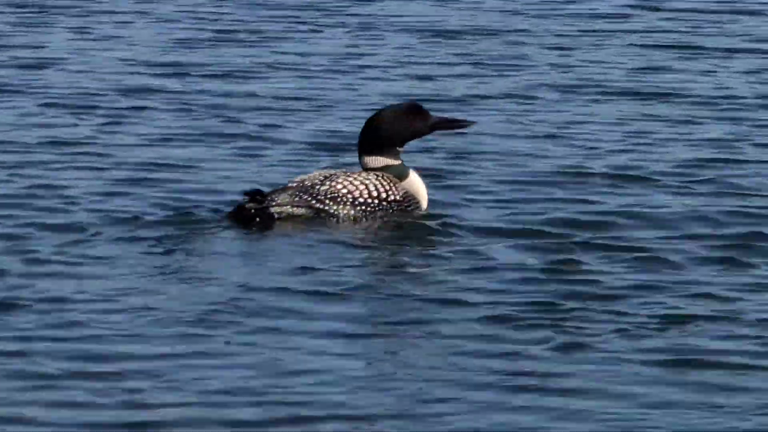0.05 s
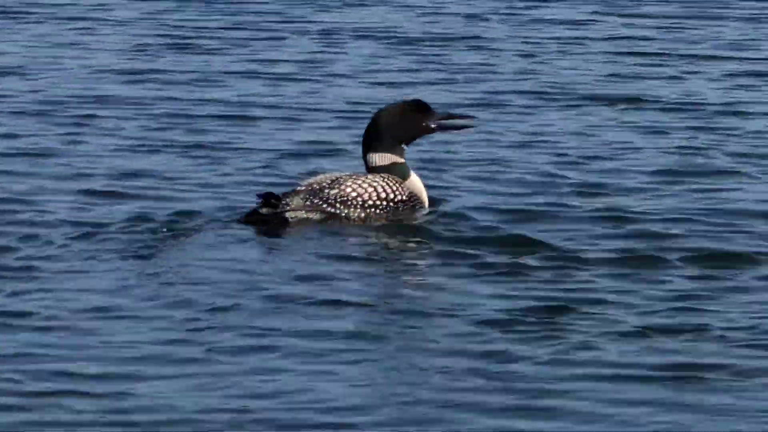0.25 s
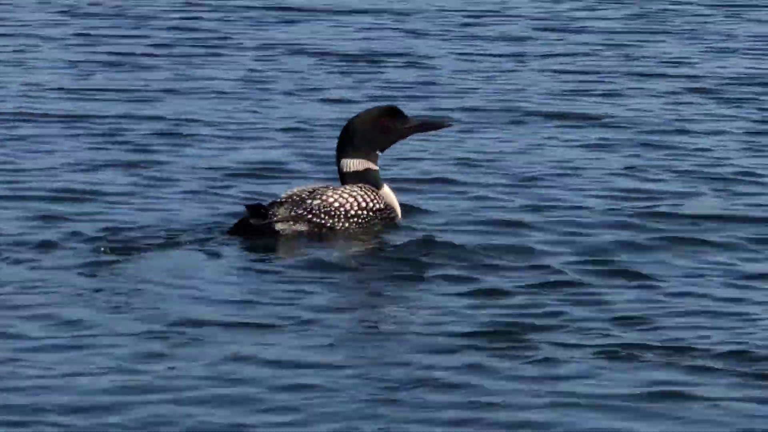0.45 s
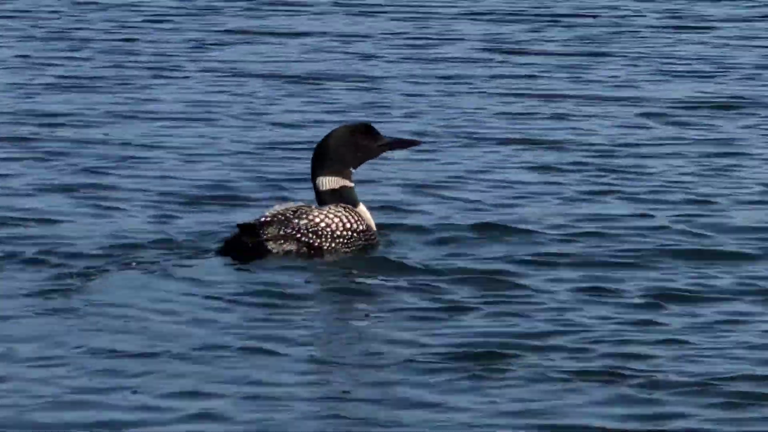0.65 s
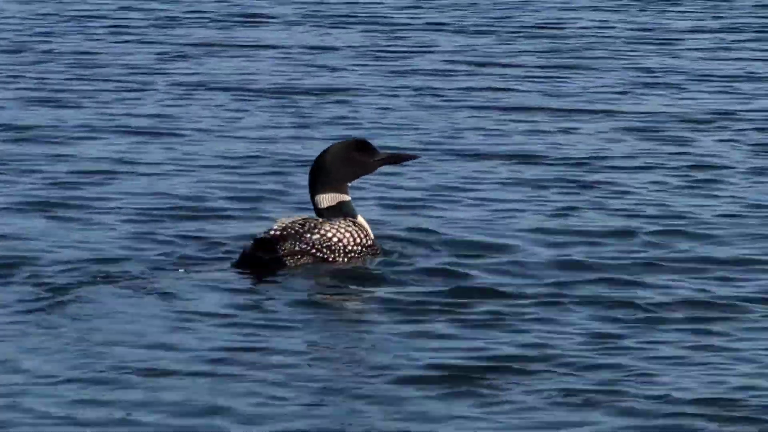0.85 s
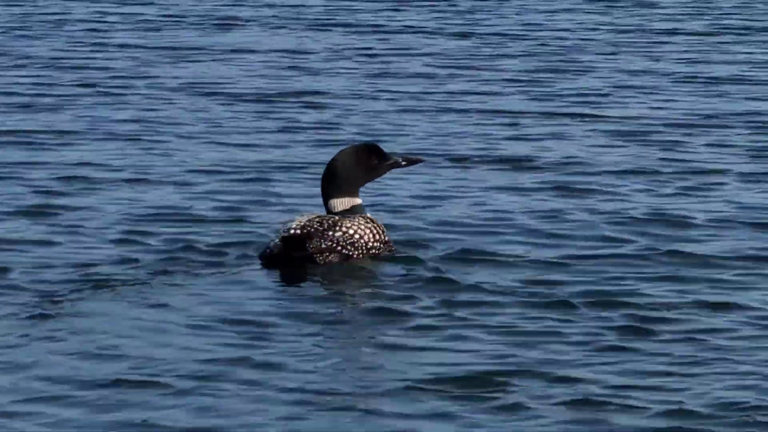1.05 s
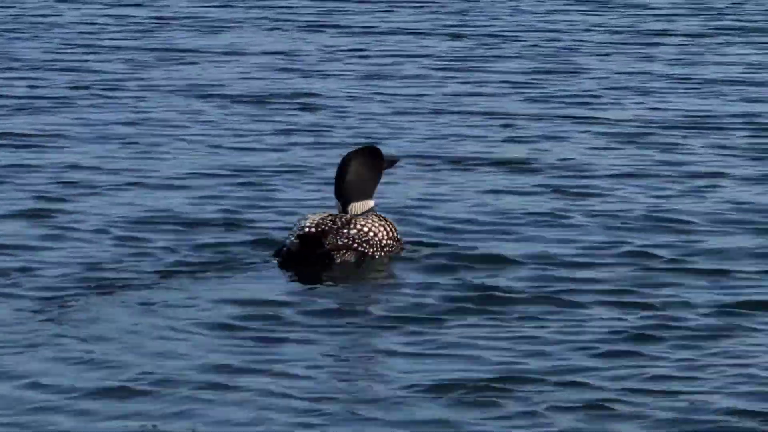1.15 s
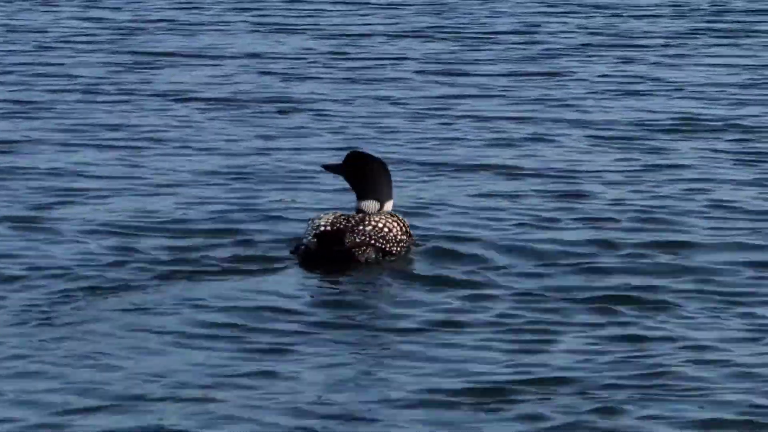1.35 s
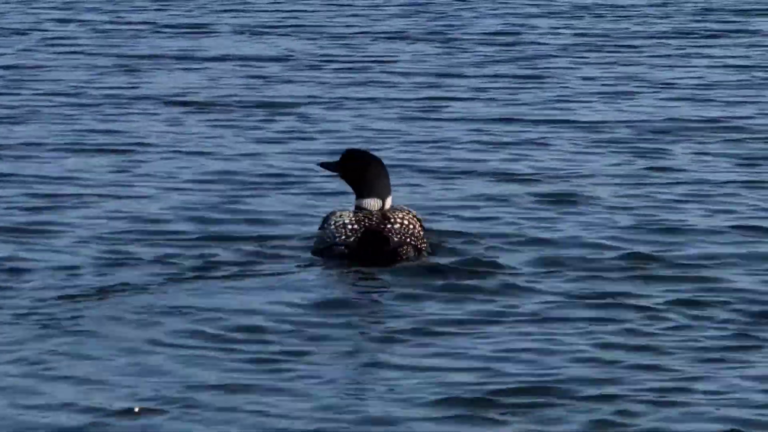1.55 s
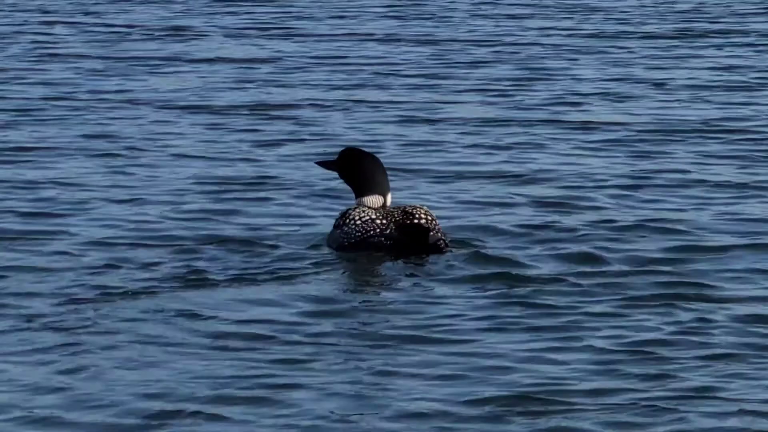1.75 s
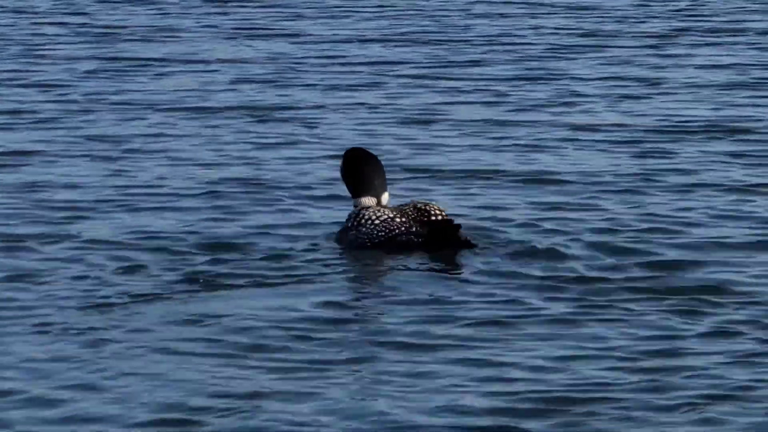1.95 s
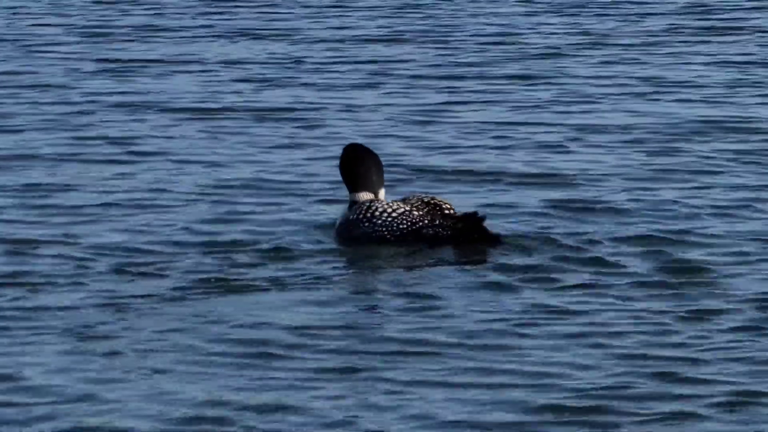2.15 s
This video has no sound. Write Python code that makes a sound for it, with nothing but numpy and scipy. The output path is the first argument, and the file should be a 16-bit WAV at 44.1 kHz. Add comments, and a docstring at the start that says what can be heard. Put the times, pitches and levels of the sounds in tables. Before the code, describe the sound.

Loon calls over a lake. From 0 s one loon holds a smooth, hollow wail, sagging and breaking low near 0.8 s. At 0.16 s a second slides up, flips high and gives three loud, slightly raspy swells around 0.36, 0.47 and 0.59 s, ending by 0.65. A faint echo lingers over soft breeze; low water thuds, small knocks near 1.2 and 1.9 s, and distant chirps from 1 s.

```python
"""Two loons on a quiet lake

One loon holds a smooth wail, a few harmonics that sag and break into a low note at the end.
The other slides up in its low register, flips to the high one and gives three loud tremolo swells,
pitch and level rising together. The wooded shore returns a faint echo, made by a decaying noise tail.
Water laps and knocks near the microphone as low sine thuds and ringing noise. Far off a small bird
chirps in short sine glides, over shaped noise for the open air and breeze."""
import sys
import numpy as np
from scipy import signal
from scipy.fft import rfft, irfft
from scipy.io import wavfile
from scipy.ndimage import uniform_filter1d, minimum_filter1d

SR = 44100
rng = np.random.default_rng(int(sys.argv[2]) if len(sys.argv) > 2 else 0)


def master_out(mix):
    """Clip the mix to full scale and print it as 16-bit PCM to the path in sys.argv[1]."""
    frames = np.transpose(np.atleast_2d(mix))
    ceiling = np.clip(frames, -1, 1)
    pcm = np.round(ceiling * 32767).astype(np.int16)
    wavfile.write(sys.argv[1], SR, pcm)


N = 97020  # 2.2 s

SIDES = np.array([[1], [-1]])  # left, right
JITTER, JITTER_HZ = 0.0026, 266  # pitch tremble as a fraction of pitch, and its fastest rate
SHIMMER_DB = 0.19


def undb(db):
    """Decibels to amplitude."""
    return 10 ** (np.asarray(db) / 20)


def times():
    """Time of each sample in seconds."""
    return np.arange(N) / SR


def bins():
    """Frequency of each spectrum bin in Hz."""
    return np.arange(N // 2 + 1) * SR / N


def curves(table):
    """Each column of a table, joined by straight lines in time."""
    a = np.array(table, float)
    return [np.interp(times(), a[:, 0], column) for column in a.T[1:]]


def gate(table):
    """Open from a table's first row to its last, with 4 ms ramps."""
    since_start = times() - table[0][0]
    until_end = table[-1][0] - times()
    return np.clip(np.minimum(since_start, until_end) / .004, 0, 1)


def at(table, hz, axis=1):
    """A column of a table on a log-frequency axis."""
    a = np.array(table, float)
    return np.interp(np.log(np.maximum(hz, 1)), np.log(a[:, 0]), a[:, axis])


def bell(centre_s, half_s):
    """A rounded rise and fall that stands at half height half_s from its centre."""
    return .5 ** (((times() - centre_s) / half_s) ** 2)


def pan(left_minus_right_db):
    """Gains that split a level difference evenly between left and right."""
    return undb(SIDES * left_minus_right_db / 2)


def colour(x, gain):
    """Filter a sound with a gain for each frequency."""
    return irfft(rfft(x) * gain, N)


def noise(gain):
    """Noise of rms 1 with a gain for each frequency."""
    x = colour(rng.standard_normal(N), gain)
    return x / x.std()


def walk(hz):
    """Smooth chance of rms 1, mostly slower than a given rate."""
    return noise(1 / (1 + (bins() / hz) ** 4))


def turn(hz, steadiness=1):
    """Phase of a pitch that trembles slightly; a smaller steadiness factor trembles less."""
    return 2 * np.pi * np.cumsum(hz * (1 + steadiness * JITTER * walk(JITTER_HZ))) / SR


def partial(phase, db):
    """One harmonic of a given rms level, shimmering a little."""
    return np.sqrt(2) * undb(db + SHIMMER_DB * walk(120)) * np.sin(phase)


# open-air hiss at the microphone: pitch_hz, relative_level_db
AIR_COLOUR = [(60, -9), (130, -2), (200, 0), (330, -6.5), (450, -6.5), (760, -12), (900, -17),
              (1600, -22.5), (2100, -18.5), (2800, -19), (3600, -26.5), (5000, -29), (8000, -37.5),
              (12000, -30), (15000, -34)]
# how far the hiss spreads between the channels: pitch_hz, side_gain
AIR_SPREAD = [(100, .3), (700, 0.57), (3000, .6), (6000, .9), (15000, 1)]
# low breeze: pitch_hz, relative_level_db
RUMBLE_COLOUR = [(15, -8.5), (35, 0.5), (65, -1), (120, -7), (250, -22), (600, -40.5), (2000, -77.5)]
# swell of the breeze before its random waver: time_s, level_db
RUMBLE_LEVEL = [(0, -64.5), (.3, -57.5), (.5, -51), (.7, -58.5), (1.0, -56), (1.3, -65.5), (1.62, -67.5),
                (1.8, -56.5), (2.0, -56.5), (2.2, -67)]


def air(hiss_db=-63.5, hiss_waver_db=1.6, rumble_waver_db=4.4, rumble_side=.9):
    """Open-air hiss over a low breeze: shaped noises wavering in level, each with a side part for width."""
    hiss_gain = undb(at(AIR_COLOUR, bins())) * bins() / np.hypot(bins(), 90)  # thinned below 90 Hz
    hiss_side = colour(noise(hiss_gain), at(AIR_SPREAD, bins()))
    hiss = undb(hiss_db + hiss_waver_db * walk(8.6)) * (noise(hiss_gain) + SIDES * hiss_side)
    low_gain = undb(at(RUMBLE_COLOUR, bins()))
    rumble_level = undb(curves(RUMBLE_LEVEL)[0] + rumble_waver_db * walk(6.4))
    rumble = rumble_level * (noise(low_gain) + SIDES * rumble_side * noise(low_gain))
    return hiss + rumble


# small bird far off: start_s, length_s, start_pitch_hz, end_pitch_hz, peak_level_db
CHIRP_NOTES = [(0.979, .06, 2650, 2500, -66), (1.037, 0.045, 3210, 3120, -70),
               (1.096, 0.073, 2770, 3100, -72), (1.508, 0.058, 2560, 2840, -73),
               (1.58, 0.0557, 2940, 2764, -73), (1.724, 0.0331, 2850, 2700, -71),
               (1.792, 0.03, 3800, 4245, -73), (1.788, 0.047, 3020, 2960, -66),
               (1.877, .05, 2900, 2455, -64.5), (1.919, 0.0503, 2500, 2860, -65),
               (2.093, .035, 2720, 2790, -70), (2.154, 0.029, 2750, 2950, -69.5)]


def songbird(warble=.03):
    """Faint whistled glides: sines sliding between two pitches with a random warble, a fraction of pitch."""
    out = 0
    for start_s, length_s, start_hz, end_hz, db in CHIRP_NOTES:
        progress = np.clip((times() - start_s) / length_s, 0, 1)
        glide = start_hz + (end_hz - start_hz) * progress
        whistle = np.sin(turn(glide * (1 + warble * walk(145))))
        out = out + undb(db) * np.sin(np.pi * progress) * whistle
    return out


# low thuds near the microphone: centre_s, pitch_hz, peak_level_db, half_length_s
WATER_THUDS = [(0.058, 51.43, -57, .02), (0.251, 49.83, -46, 0.018), (.43, 55, -43.5, 0.019),
               (0.754, 59.6, -34.5, 0.0093), (0.781, 66.37, -40, 0.018), (0.867, 57.5, -39, 0.017),
               (0.941, 119.2, -40.5, 0.0096), (0.979, 86.2, -48, 0.017), (1.055, 65.4, -49, 0.017),
               (1.185, 70.44, -45, 0.0089), (1.226, 51.1, -44, 0.015), (1.721, 50, -44, .02),
               (1.795, 54.5, -38.5, 0.016), (1.903, 54.3, -45, 0.0089), (1.969, 57, -51, 0.019)]
# laps and knocks near the microphone: start_s, centre_hz, width_hz, level_db, t60_s, left_minus_right_db
WATER_KNOCKS = [(.93, 430, 380, -42, .12, 0), (1.2088, 1100, 220, -31.5, .03, 1),
                (1.209, 2200, 1500, -53, .045, 0), (1.212, 230, 300, -44, .13, 1),
                (1.52, 400, 600, -57, .3, 0), (1.8745, 2800, 1000, -44, .03, -3),
                (1.875, 1080, 300, -54, .03, 0), (1.9135, 2050, 550, -42, .033, -3),
                (1.914, 1020, 250, -49, .035, 0), (1.926, 300, 350, -55, .25, 3)]


def water(thud_pan_db=-2, knock_attack_s=.001, knock_top_hz=3573):
    """Lapping water: low sine thuds under bell envelopes, and resonant noise that dies exponentially."""
    out = np.zeros((2, N))
    for centre_s, hz, db, half_s in WATER_THUDS:
        cycles = hz * (times() - centre_s) + rng.random()
        thud = undb(db) * bell(centre_s, half_s) * np.sin(2 * np.pi * cycles)
        out += thud * pan(thud_pan_db)
    for start_s, hz, width_hz, db, t60_s, pan_db in WATER_KNOCKS:
        age = np.maximum(times() - start_s, 0)
        detuning = hz / width_hz * (bins() / hz - hz / (bins() + 1))
        ring = noise(1 / (1 + detuning ** 2) / (1 + (bins() / knock_top_hz) ** 4))
        decay = undb(db - 60 * age / t60_s) * (1 - np.exp(-age / knock_attack_s))
        out += ring * decay * pan(pan_db)
    return out


# dull colour of the distant shore: pitch_hz, gain_db
SHORE_COLOUR = [(400, -1), (650, 6), (780, -0.5), (1250, -8.5), (1450, -6.5), (1600, -7), (2500, -5),
                (5000, -6.5)]


def shore(calls, echo_db=-36.5, t60_s=3.56, build_s=0.027):
    """A faint, dull, long echo from the wooded shore: a separate decaying noise tail for each channel."""
    tail = undb(-60 * times() / t60_s) * (1 - np.exp(-times() / build_s))
    tail = tail / np.sqrt(np.sum(tail ** 2))
    dulled = colour(calls, undb(at(SHORE_COLOUR, bins())))
    echoes = [signal.fftconvolve(dulled, tail * rng.standard_normal(N))[:N] for _ in range(2)]
    return undb(echo_db) * np.array(echoes)


def low_note(table, throat, count, rolloff_db=10.5, rasp=.05):
    """Low register: four strong harmonics, then a roll-off that steepens when soft, through the throat."""
    hz, db = curves(table)
    phase = turn(hz)
    below_peak_db = np.maximum(db - db.max(), -30)
    roll_db = rolloff_db - 0.22 * below_peak_db  # lost with each harmonic above the fourth
    out = 0
    for k in range(1, count + 1):
        level_db = db + at(throat, k * hz) - roll_db * max(k - 4, 0)
        out = out + partial(k * phase, level_db) * (1 + rasp * walk(300))
    return gate(table) * out


# first loon's held note: time_s, pitch_hz, fundamental_db, octave_db
WAIL_NOTE = [(0, 600.9, -66, -86), (.028, 616.2, -48, -52), (.05, 626, -43.5, -39), (.11, 654, -39, -30.5),
             (.15, 660, -37.5, -29.5), (.28, 656.4, -35.5, -21.5), (.39, 658, -38.5, -28.5),
             (.48, 650, -38, -30.5), (.56, 635, -42, -35.5), (.645, 626.6, -32.5, -32.5),
             (.67, 611.5, -33, -30.5), (.70, 615.5, -35, -28.5), (.725, 615.7, -34.5, -33.5),
             (.75, 578, -41.5, -52), (.772, 603, -61, -67)]
# third harmonic against the octave: pitch_hz, relative_level_db
WAIL_THIRD_LEVEL = [(1700, -25.5), (1860, -35), (1910, -26.5), (1960, -22.5), (2000, -31)]


def wail():
    """A clean held note: fundamental, octave and a weak third harmonic."""
    hz, fund_db, octave_db = curves(WAIL_NOTE)
    phase = turn(hz, steadiness=0.42)
    levels = [fund_db, octave_db, octave_db + at(WAIL_THIRD_LEVEL, 3 * hz)]
    return gate(WAIL_NOTE) * sum(partial(k * phase, db) for k, db in enumerate(levels, 1))


# low break at the end of the wail: time_s, pitch_hz, level_db (before the throat)
BREAK_NOTE = [(.755, 392, -75), (.768, 379, -47), (.78, 357, -42), (.795, 326.6, -51), (.815, 309.2, -72.5)]
# throat in the break: pitch_hz, gain_db
BREAK_THROAT_COLOUR = [(350, -2), (720, -4.5), (1080, -4), (1450, -21), (1900, -26), (3000, -34)]


def wail_break():
    """The falling low-register note into which the wail breaks."""
    return low_note(BREAK_NOTE, BREAK_THROAT_COLOUR, count=6)


# second loon's breath: pitch_hz, relative_level_db
BREATH_SPECTRUM = [(2500, -7), (3400, 1), (4800, -0.5), (6500, -2), (7800, -10), (10500, -6), (11500, -21),
                   (15000, -30.5)]


def breath(gain=1):
    """Air rushing through the second loon's throat: shaped noise of rms 1."""
    return noise(undb(at(BREATH_SPECTRUM, bins())) * gain)


# second loon's rising low note: time_s, pitch_hz, level_db (before the throat)
SLIDE_NOTE = [(.163, 358, -67.5), (.177, 355.6, -49), (.205, 328.5, -47), (.216, 357.7, -40),
              (.226, 390.2, -29), (.24, 420.2, -24.5), (.255, 459.6, -22.5), (.268, 474.5, -24.5),
              (.284, 507, -26), (.296, 518.6, -50)]
# throat in the low register: pitch_hz, gain_db
SLIDE_THROAT = [(330, 0), (450, -13), (520, -9), (700, -2), (950, 0), (1100, -1), (1400, -2.5),
                (1550, -7.5), (1820, 3), (1910, -3), (1990, -26.5), (2100, -7), (2380, -7), (2500, -22),
                (2850, -13.5), (3100, -18), (4500, -26)]


def slide(breath_db=-42):
    """The rising low note, with a little breath that follows its level."""
    soft_air = breath(1 / (1 + (bins() / 4500) ** 4))
    airy = undb(curves(SLIDE_NOTE)[1] + breath_db) * soft_air
    return low_note(SLIDE_NOTE, SLIDE_THROAT, count=10) + gate(SLIDE_NOTE) * airy


# upper harmonics, one row each from the fifth on: between_swells_db, at_crest_db
OVERTONE_LEVELS = [(-2.5, -14.5), (-5.5, -6.5), (-4, -3), (-13, -4), (-19, -18.5), (-9, -24.5),
                   (-18, -20.5), (-19.5, -15.5), (-21.5, -15.5), (-17.5, -26), (-17, -36), (-23.5, -39.5)]
# hoarse moments as a swell collapses: centre_s, half_length_s, level_db
HOARSE_MOMENTS = [(0.377, 0.042, -63), (0.49, .022, -51)]
# colour of the hoarse rush: pitch_hz, relative_level_db
HOARSE_SPECTRUM = [(600, -12), (2500, -4), (4800, -0.5), (6600, 2.5), (7800, -6), (9500, 1), (10800, -2.5),
                   (11500, -22.5), (15000, -31.5)]


def overtones(hz, phase, db, effort, jitter=0.0018, patchy_db=4, patchy_hz=25.2, rasp=.2, breath_db=-8):
    """Thin upper harmonics that change with effort and flicker, with breath and brief hoarse rushes."""
    phase = phase + 2 * np.pi * np.cumsum(hz * jitter * walk(500)) / SR
    lines = 0
    for k, (rest_db, crest_db) in enumerate(OVERTONE_LEVELS, 5):
        strength_db = rest_db + (crest_db - rest_db) * effort
        flicker_db = patchy_db * walk(patchy_hz)
        lines = lines + partial(k * phase, db + strength_db + flicker_db) * (1 + rasp * walk(140))
    rush = sum(undb(level) * bell(centre_s, half_s) for centre_s, half_s, level in HOARSE_MOMENTS)
    hoarse = rush * noise(undb(at(HOARSE_SPECTRUM, bins())))
    return lines + undb(db + breath_db) * breath() + hoarse


# second loon's underlying high note: time_s, pitch_hz, level_db, overtone_level_db
TREMOLO_NOTE = [(.281, 640, -50.5, -81.5), (.294, 637, -32, -77), (.316, 613.1, -26.5, -79.5),
                (.335, 632, -25.5, -54.5), (.42, 634, -28.5, -51), (.5, 632.6, -25.5, -50.5),
                (.54, 637.2, -29, -53.5), (.61, 632, -31.5, -56), (.63, 628.5, -35, -57.5),
                (.655, 612, -62, -82)]
# swells added to that note: centre_s, half_width_s (each curve scales it), pitch_rise_hz,
# fundamental_gain_db, octave_gain_db, top_flatness (an exponent)
TREMOLO_SWELLS = [(.364, 0.029, 155.7, 12.5, 17.5, 4.5), (.469, .027, 160.9, 12.5, 16.5, 5.7),
                  (.586, .0235, 100.7, 10, 14.5, 1.7)]


def tremolo(pitch_shape=2.3, fund_flatness=1.7, fund_width=0.97, octave_width=0.89):
    """Each swell lifts pitch and level together; thin raspy overtones ride on top."""
    hz, db, top_db = curves(TREMOLO_NOTE)
    fund = octave = effort = 0
    for centre_s, half_s, rise_hz, fund_db, octave_db, flatness in TREMOLO_SWELLS:
        u = np.abs(times() - centre_s) / half_s
        hz = hz + rise_hz * .5 ** (u ** pitch_shape)
        push = .5 ** ((u / fund_width) ** (fund_flatness * flatness))
        fund = fund + fund_db * push
        effort = effort + push
        octave = octave + octave_db * .5 ** ((u / octave_width) ** flatness)
    phase = turn(hz)
    # harmonics one to four, against the underlying note
    gains_db = [fund, 2.5 + octave, -32.5 + 20.5 * effort, -46 + 24.5 * effort]
    body = sum(partial(k * phase, db + gain) for k, gain in enumerate(gains_db, 1))
    return gate(TREMOLO_NOTE) * (body + overtones(hz, phase, top_db, effort))


def ports(x, table):
    """A call reaching two microphone ports, with level and phase differences at each frequency."""
    half = undb(at(table, bins()) / 2) * np.exp(.5j * at(table, bins(), axis=2))
    return colour(x, np.array([half, 1 / half]))


# first loon at the two microphone ports: pitch_hz, left_minus_right_db, left_lead_rad
FIRST_LOON_PORTS = [(600, 1.5, .1), (660, 1.5, -.2), (1230, -0.9, -0.93), (1280, -5, 2.3),
                    (1426, -10.5, 1.9), (2000, -6, 1.45), (4940, -2.5, 0.9)]
# second loon at the two microphone ports: pitch_hz, left_minus_right_db, left_lead_rad
SECOND_LOON_PORTS = [(400, 1, 0), (639.4, 4.5, 0.6), (754, -4.5, -1.36), (1296, -1, 0.2), (1480, -5, 1.27),
                     (1570, -3.5, 0.52), (2317, -5, 0.45), (4500, -4.5, 1.55), (6633, -4.5, 3.5),
                     (10500, -3, 5.5)]


def scene():
    """Air, far songbird, near water and the shore's echo around the two loons."""
    first = wail() + wail_break()
    second = slide() + tremolo()
    background = air() + songbird() + water() + shore(first + second)
    return background + ports(first, FIRST_LOON_PORTS) + ports(second, SECOND_LOON_PORTS)


def record(dry, limit=.96, hold_s=.004, top_hz=15500):
    """A limiter holds the loudest peaks in each channel; the recorder cuts the top."""
    span = int(hold_s * SR)
    needed = np.minimum(1, limit / (np.abs(dry) + 1e-9))
    gain = minimum_filter1d(needed, 2 * span + 1, axis=1)
    smooth = uniform_filter1d(uniform_filter1d(gain, span, axis=1), span, axis=1)
    top_cut = signal.ellip(8, .2, 70, top_hz, fs=SR, output="sos")
    return signal.sosfilt(top_cut, dry * smooth)


dry = scene()
out = record(dry)
master_out(out)
```